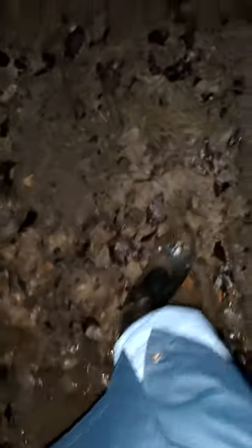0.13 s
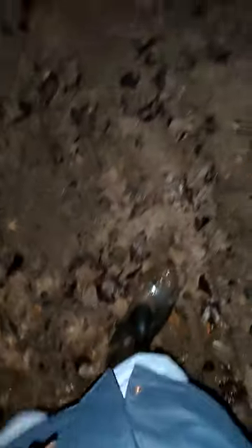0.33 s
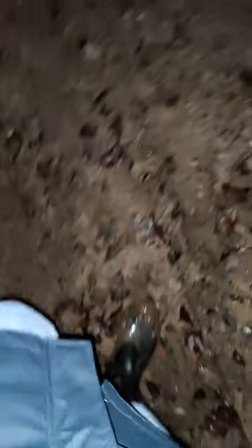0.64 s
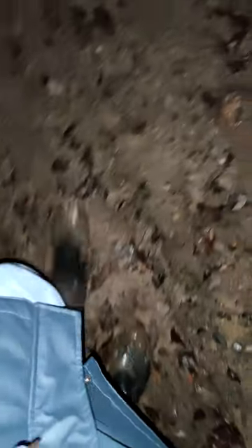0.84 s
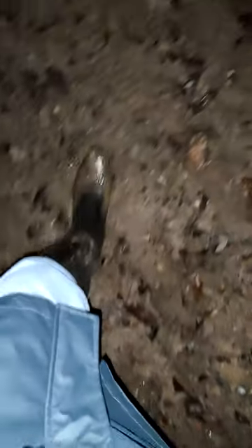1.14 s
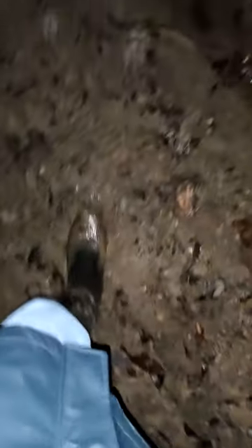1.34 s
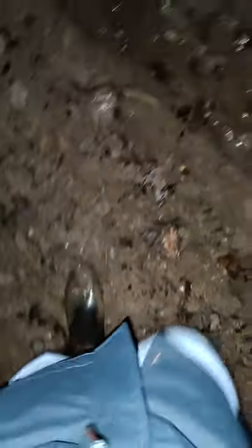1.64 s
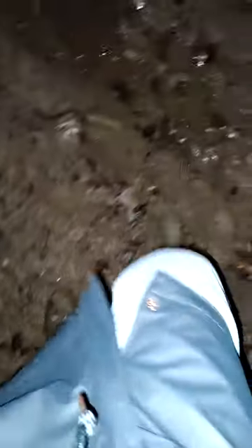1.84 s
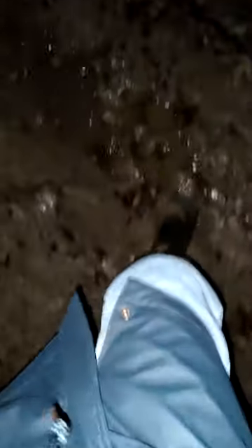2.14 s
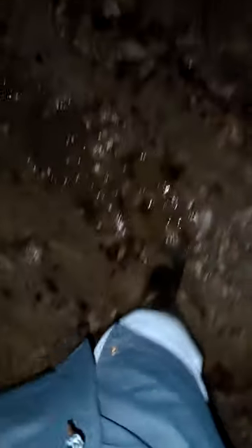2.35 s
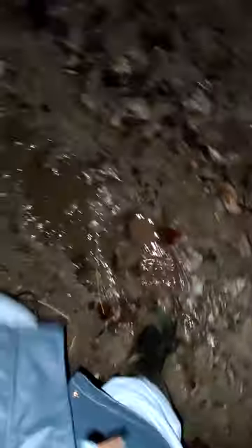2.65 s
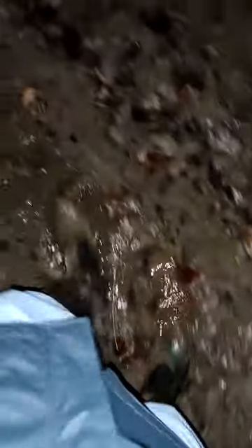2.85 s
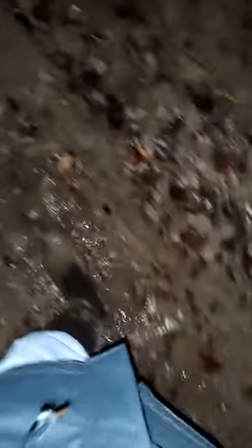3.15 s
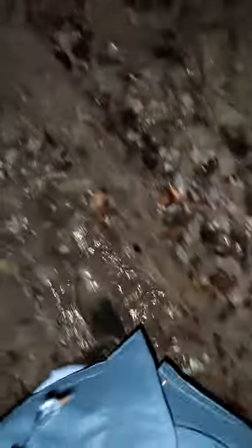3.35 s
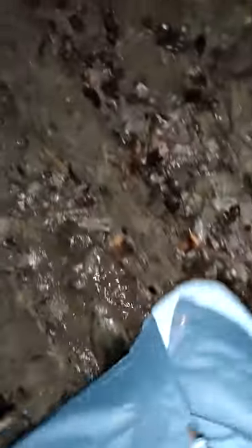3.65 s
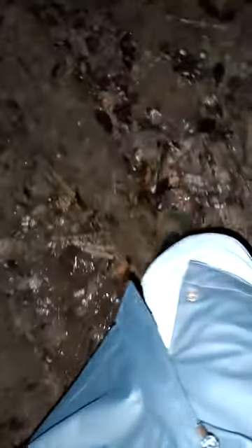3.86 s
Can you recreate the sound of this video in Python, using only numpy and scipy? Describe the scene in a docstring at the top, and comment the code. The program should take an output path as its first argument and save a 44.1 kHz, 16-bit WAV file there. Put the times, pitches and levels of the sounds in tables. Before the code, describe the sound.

Slow, wet footsteps in mud, with small pops, a swishing coat and light gusts.

```python
"""Rubber boots walk slowly through wet mud at night, heard from a hand-held camera.
Each step forces mud from under the sole with a slosh, a squish and a spray; water films snap,
and air pockets ring as damped resonators when the mud closes again. Friction makes the coat swish.
The right microphone is nearer the coat and in the moving air, whose pressure fluctuations
give rumble and short puffs. A faint wind hiss lies behind it all."""
import sys
import numpy as np
from scipy import signal
from scipy.fft import rfft, irfft
from scipy.io import wavfile
from scipy.ndimage import uniform_filter1d

SR = 44100
rng = np.random.default_rng(int(sys.argv[2]) if len(sys.argv) > 2 else 0)


def pcm_store(signal):
    """Save signal as 16-bit PCM."""
    levels = np.round(np.clip(np.atleast_2d(signal), -1, 1) * 32767)
    wavfile.write(sys.argv[1], SR, levels.astype(np.int16).T)


N = 176400
T = np.arange(N) / SR
FREQS_HZ = np.fft.rfftfreq(N, 1 / SR)


def amp(db):
    """Amplitude ratio of a level in decibels."""
    return 10 ** (np.asarray(db) / 20)


def unit_rms(x):
    """Normalisation to unit mean power."""
    return x / np.sqrt(np.mean(x ** 2) + 1e-20)


def colour(x, spectrum):
    """Spectral shaping by (frequency [Hz], gain [dB]) points, joined on a log-frequency axis."""
    hz, db = np.transpose(spectrum)
    return irfft(rfft(x) * amp(np.interp(np.log(FREQS_HZ + 1), np.log(hz), db)), N)


def place(mix, start_s, sound, pan_db):
    """Amplitude panning: adds a sound to the mix, pan_db stronger on the left than on the right."""
    part = mix[:, round(start_s * SR):][:, :sound.shape[-1]]
    part += (amp([[pan_db / 2], [-pan_db / 2]]) * sound)[:, :part.shape[1]]


def drift(span_s):
    """Low-pass noise: two moving averages leave a slow wander of rms 1."""
    size = max(int(span_s * SR), 2)
    smoothed = uniform_filter1d(rng.standard_normal(N), size, mode="wrap")
    return unit_rms(uniform_filter1d(smoothed, size, mode="wrap"))


def noise(grit=0, correlation=0, clicks_per_s=900, spread_db=2.5):
    """Stereo white noise of 0 dB per Hz; the share grit of its power is shot noise (tiny clicks)."""
    sizes = amp(spread_db * np.minimum(rng.exponential(1, (3, N)), 4)) * rng.choice([-1, 1], (3, N))
    clicks = unit_rms(sizes * (rng.random((3, N)) < clicks_per_s / SR))
    white = np.sqrt(grit) * clicks + np.sqrt(1 - grit) * rng.standard_normal((3, N))
    common, separate = white[0], white[1:]
    return np.sqrt(SR / 2) * (np.sqrt(correlation) * common + np.sqrt(1 - correlation) * separate)


def swells(rows, shape=1.84):
    """Incoherent addition: the amplitude envelope of rising and falling events summed in power."""
    power = np.zeros(N)
    for peak_s, rise_s, fall_s, db in rows:
        width_s = np.where(T < peak_s, rise_s, fall_s)
        power += amp(db) ** 2 * np.exp(-(abs(T - peak_s) / width_s) ** shape)
    return np.sqrt(power)


def resonate(x, hz, width_hz):
    """A resonance of about unit peak gain whose centre follows the curve hz."""
    carrier = np.exp(2j * np.pi * np.cumsum(hz) / SR)
    pole = np.exp(-np.pi * width_hz / SR)
    return 2 * (carrier * signal.lfilter([1 - pole], [1, -pole], x / carrier)).real


# Spectrum of the open-air wind, and its extra gain on the right (frequency [Hz], level [dB])
WIND_SPECTRUM = [(25, -91.5), (60, -87.5), (110, -87), (200, -87.5), (450, -93.5), (800, -96.5),
                 (1500, -98), (2200, -100), (3300, -103), (5500, -104), (7000, -102), (8700, -107),
                 (11000, -108), (14500, -111)]
WIND_RIGHT_GAIN = [(30, 9), (100, 4), (400, 1.5), (2000, 2), (4000, -4), (14000, -5)]
# Course of the wind's strength (time [s], level [dB])
WIND_LEVEL = [(0, 2.5), (.35, 3), (.8, 0.5), (1.0, 1), (1.17, 1), (1.4, 2), (1.7, 7), (2.0, -2), (3.3, 2.5),
              (3.5, 1.5), (3.65, 4.5), (4, 6.5)]


def wind(drift_db=3.48):
    """Flow noise: a faint broadband hiss under slow amplitude modulation."""
    hiss = colour(noise(grit=0.31, correlation=0.12), WIND_SPECTRUM)
    level_db = np.interp(T, *np.transpose(WIND_LEVEL)) + drift_db * drift(0.21)
    left, right = hiss * amp(level_db)
    return np.array([left, colour(right, WIND_RIGHT_GAIN)])


# Gusts, and the hiss of the strongest one (peak time [s], rise [s], fall [s], level [dB])
GUSTS = [(0.38, 0.016, 0.13, -71.5), (0.685, 0.0097, 0.017, -57.5), (0.735, 0.0096, 0.012, -59.5),
         (0.793, 0.013, 0.018, -56.5), (0.98, 0.024, 0.026, -57), (1.02, 0.0084, 0.0083, -59),
         (1.11, 0.027, 0.038, -59.5), (1.32, 0.5, 0.052, -70), (1.445, 0.027, 0.032, -58),
         (1.495, 0.061, 0.049, -53), (1.63, 0.054, 0.042, -62.5), (2.68, 0.015, 0.022, -71),
         (2.92, 0.073, 0.088, -72), (3.125, 0.038, 0.017, -62), (3.232, 0.015, 0.0091, -60)]
GUST_HISS = (1.497, .055, .062, -88)
# Spectra of slow eddies, fast eddies and gust hiss (frequency [Hz], level [dB])
SLOW_EDDY_SPECTRUM = [(20, -18), (50, -4.5), (100, 2), (170, -10.5), (280, -19), (450, -61), (1000, -36),
                      (3000, -69)]
FAST_EDDY_SPECTRUM = [(20, -38), (80, -36), (150, 4.5), (220, -3), (300, -11), (450, -28), (1000, -31.5),
                      (3000, -45)]
HISS_SPECTRUM = [(200, 15), (700, -8), (1600, -1), (3000, -2.5), (7000, -2.5), (11000, -10.5), (14500, -17)]
# Single eddies striking the microphone (time [s], rise [s], level [dB], rebound width [s])
PUFFS = [(0.341, 0.0011, -27.5, .008), (1.1646, 0.0025, -27.5, .007), (1.329, .0006, -31.5, .002),
         (1.556, 0.00094, -30, .002), (1.7876, 0.00049, -31, .004), (1.8816, 0.00038, -30.5, .002),
         (2.0774, 0.00016, -23, .0016), (2.0808, 0.00055, -23, .0022), (2.6543, 0.00037, -8.5, .0014),
         (2.678, 0.00081, -27, .003), (2.701, 0.0011, -25, .002), (2.7961, 0.00054, -24.5, .0016),
         (3.0036, 0.00053, -31, .002), (3.76, 0.00084, -24, .0028), (3.918, 0.00095, -30, .002)]


def buffeting(crossover_db=-52.5, left_db=-34):
    """Turbulent pressure at the right port: eddies rumble, faster in strong gusts, and some thump."""
    force = swells(GUSTS)
    slow, fast = noise()
    fast_share = 1 / (1 + (amp(crossover_db) / (force + 1e-9)) ** 2)
    pressure = force * np.sqrt(1 - fast_share) * colour(slow, SLOW_EDDY_SPECTRUM)
    pressure += force * np.sqrt(fast_share) * colour(fast, FAST_EDDY_SPECTRUM)
    pressure += swells([GUST_HISS], shape=4.6) * colour(noise()[0], HISS_SPECTRUM)
    for start_s, rise_s, db, rebound_s in PUFFS:
        age, width = (T - start_s) / rise_s, rebound_s / rise_s
        # Suction and rebound have equal areas, so a puff leaves no net pressure.
        suction = np.maximum(age, 0) * np.exp(-abs(age))
        rebound = np.exp(-((age - 1) / width) ** 2) / (width * np.sqrt(np.pi))
        pressure += amp(db) * np.e * (rebound - suction)
    return pressure * amp([[left_db], [0]])


# Strokes of the coat
# (peak time [s], rise [s], fall [s], rustle level [dB], rasp pitch [Hz], rasp level [dB])
SWISHES = [(1.89, 0.1, 0.15, -84, 1890, -90), (2.04, 0.055, 0.041, -80.5, 3600, -80.5),
           (2.10, 0.034, 0.037, -78, 1920, -86.5), (2.246, 0.041, 0.049, -80, 5940, -88),
           (2.44, 0.079, 0.11, -76, 5000, -87), (2.68, 0.065, 0.039, -79.5, 6840, -92),
           (2.98, 0.42, 0.34, -91, 4140, -106), (3.78, 0.25, 0.068, -92.5, 2200, -108)]
# Spectra of the rustling cloth and of the rasping weave (frequency [Hz], level [dB])
RUSTLE_SPECTRUM = [(40, -39), (130, 1.5), (270, 5), (450, -2.5), (1100, -4.5), (1900, -0.5), (3100, -10),
                   (4300, -8.5), (7000, -14.5), (11000, -18.5), (14500, -23)]
WEAVE_SPECTRUM = [(400, -22), (1500, 1.5), (9000, -4.5), (14500, 8)]


def coat(sag_octaves_per_s=2.2, rustle_left_db=-7, rasp_left_db=-11, drift_db=1.0):
    """Sliding friction of fabric: a broad rustle, and a rasp that sinks as the stroke slows."""
    rustle = colour(noise(grit=0.41, correlation=0.044), RUSTLE_SPECTRUM)
    rustle *= swells([row[:4] for row in SWISHES])
    weave = colour(noise(grit=0.29), WEAVE_SPECTRUM)
    rasp = np.zeros((2, N))
    for peak_s, rise_s, fall_s, _, hz, rasp_db in SWISHES:
        pitch_hz = hz * 2 ** (-sag_octaves_per_s * np.clip(T - peak_s, -0.2, 0.2))
        width_hz = 0.53 * hz
        band = resonate(resonate(weave, pitch_hz, width_hz), pitch_hz, width_hz)
        rasp += band * swells([(peak_s, rise_s, fall_s, rasp_db)])
    cloth = rustle * amp([[rustle_left_db], [0]]) + rasp * amp([[rasp_left_db], [0]])
    return cloth * amp(drift_db * drift(0.024))


# Water films under the sole (time [s], centre [Hz], level [dB], left minus right [dB], decay [s])
FILM_SNAPS = [(1.273, 5640, -50, 4, 0.0027), (2.5662, 6660, -34.5, 3, 0.0015),
              (2.57, 6600, -26.5, 6.5, 0.0015), (2.7987, 6650, -36.5, 9.5, 0.0017),
              (2.8857, 12300, -45, 6, 0.003), (2.9398, 6800, -48, 0, 0.0018), (3.003, 5530, -48, -2, .002),
              (3.06, 6700, -47, 11, 0.0023), (3.073, 6800, -43, 12, 0.0025), (3.125, 5850, -43, 8, .001),
              (3.1373, 5740, -24, 5, 0.00041), (3.16, 7500, -32, 5, 0.0016), (3.187, 5100, -38, 1, 0.0064),
              (3.2554, 5300, -44, 0, 0.0027), (3.2952, 5200, -52, -1, .001), (3.301, 5760, -48, 3, .001),
              (3.4055, 5760, -47.5, 10, 0.00071), (3.8618, 5060, -52, 15, 0.002)]


def film_snaps(half_width_hz=1340, crisp_s=0.00091, tick_s=0.00016, tail_db=-24, tail_s=0.022):
    """Film rupture: a sharp tick and a band of fizz; the tick leads if the decay is under crisp_s."""
    out, t = np.zeros((2, N)), np.arange(2048) / SR
    hz = np.fft.rfftfreq(len(t), 1 / SR)
    for start_s, centre_hz, db, pan_db, decay_s in FILM_SNAPS:
        common, left, right = rng.standard_normal((3, len(t)))
        band = 1 / (1 + ((hz - centre_hz) / half_width_hz) ** 2)
        fizz = unit_rms(irfft(rfft([common + left, common + right]) * band))
        fizz *= np.exp(-t / decay_s) + amp(tail_db) * np.exp(-t / tail_s)
        tick = crisp_s / decay_s * np.sin(2 * np.pi * centre_hz * t) * np.exp(-t / tick_s)
        place(out, start_s, amp(db) * (tick + fizz), pan_db)
    return out


# Air pockets popping in the mud
# (time [s], pitch [Hz], level [dB], 60 dB decay time [s], left minus right [dB], roughness [ratio])
AIR_POCKETS = [(0.1742, 1480, -35, 0.031, 8, 0), (0.319, 880, -32.5, 0.0084, 8, 0.2),
               (0.3187, 1870, -49.5, 0.049, -12, 0.6), (0.5225, 742, -32.5, 0.034, 4.5, 0.06),
               (0.5223, 2236, -31.5, .023, -4.5, 0.17), (0.8461, 1710, -45, 0.04, -3, 0.2),
               (1.309, 1460, -42, 0.028, 2, 0.38), (1.3271, 940, -40, 0.0091, -7, 0.4),
               (1.340, 1690, -44, 0.015, 5, 0.8), (2.5455, 1780, -34, 0.013, 2, 0.65),
               (2.8630, 890, -40.5, 0.033, 5, 1.1), (2.8945, 610, -34, 0.027, 3.5, 0.9),
               (2.9616, 853, -21, 0.012, 5, 0.46), (2.961, 1740, -41, 0.008, 0, 0.3),
               (3.105, 1350, -38.5, 0.018, 7, 0.3), (3.118, 2830, -41, .04, 2, 0),
               (3.1265, 1580, -31, 0.0061, 6, 0.8), (3.1378, 1550, -15, 0.0052, -3, 0.42),
               (3.139, 2580, -35, 0.046, -6, .15), (3.1574, 1610, -33.5, 0.022, 7, 0.14),
               (3.16, 2700, -30.5, 0.015, -2, 0.1), (3.174, 2230, -32, 0.031, -3, 0.3),
               (3.182, 1710, -38, 0.015, 0, 0.2), (3.189, 1420, -32, 0.017, 4, 0.36),
               (3.3266, 2500, -42, 0.016, -9, 0.4), (3.374, 1850, -47.5, 0.04, -4, 0.27),
               (3.405, 2640, -46.5, 0.023, 4, 0.96), (3.443, 2850, -50.5, 0.029, -1, 0.94),
               (3.7598, 910, -48, 0.012, 0, 1.1)]


def air_pockets(glide_per_s=1.85, rise_s=0.00022, tick_gain=0.08, tick_s=0.00011):
    """Cavity resonance: each pocket bursts with a tick and rings, rising in pitch as it opens."""
    out, t = np.zeros((2, N)), np.arange(SR // 12) / SR
    for start_s, hz, db, t60_s, pan_db, roughness in AIR_POCKETS:
        cycles = hz * (t + glide_per_s * t ** 2 / 2)
        ring = np.sin(2 * np.pi * cycles) * (1 - np.exp(-t / rise_s))
        octave_band = signal.butter(2, [hz / np.sqrt(2), hz * np.sqrt(2)], "band", fs=SR)
        common, left, right = rng.standard_normal((3, len(t)))
        fizz = unit_rms(signal.lfilter(*octave_band, [common + left / 2, common + right / 2]))
        fizz *= roughness + tick_gain * np.exp(-t / tick_s)
        place(out, start_s, (ring + fizz) * amp(db - 60 * t / t60_s), pan_db)
    return out


def froth(low_hz, high_hz, per_s, pitches=24, decay_cycles=3.8, spread_db=4):
    """A Poisson process of tiny bursting bubbles, each a damped sine; about 0 dB per Hz in band."""
    out, t = np.zeros((2, N)), np.arange(SR // 50) / SR
    for hz in np.geomspace(low_hz, high_hz, pitches):
        bursting = rng.random(N) < per_s / pitches / SR
        size_db = spread_db * np.minimum(rng.exponential(1, N)[bursting], 3)
        side_db = 18 * rng.uniform(-1.1, 1, N)[bursting]
        impulses = np.zeros((2, N))
        impulses[:, bursting] = amp([size_db + side_db, size_db - side_db])
        ring = np.sin(2 * np.pi * hz * t) * np.exp(-hz * t / decay_cycles) * hz
        out += signal.oaconvolve(impulses, ring[None])[:, :N]
    return unit_rms(out) * np.sqrt(high_hz - low_hz)


# Boots pressing into the mud
# (peak time [s], rise [s], fall [s], slosh level [dB], squish level [dB], spray level [dB])
SQUELCHES = [(0.012, 0.058, 0.03, -72, -88.5, -87.5), (0.20, 0.35, 0.36, -102, -95, -98.5),
             (0.78, 0.15, 0.16, -93.5, -99, -105), (1.197, 0.0049, 0.015, -100, -91, -93.5),
             (1.267, 0.027, 0.017, -97, -87.5, -89.5), (1.315, 0.018, 0.024, -88, -100, -101),
             (1.89, 0.054, 0.021, -85.5, -103, -99), (2.191, 0.011, 0.0074, -81, -78.5, -85.5),
             (2.549, 0.036, 0.019, -89, -72.5, -89.5), (2.63, 0.066, 0.17, -87.5, -93, -87),
             (2.864, 0.0033, 0.0055, -84, -97, -106), (2.889, 0.0081, 0.0074, -79, -91, -92),
             (2.947, 0.018, 0.049, -90, -116, -98.5), (3.06, 0.011, 0.02, -92, -84, -82.5),
             (3.125, 0.025, 0.014, -85, -85, -93), (3.175, 0.047, 0.028, -88, -79, -82.5),
             (3.24, 0.066, 0.046, -94.5, -88, -92.5), (3.69, 0.029, 0.025, -91, -96, -95.5),
             (3.77, 0.036, 0.058, -86.5, -89.5, -93), (3.863, 0.0036, 0.036, -90, -97, -90.5)]
# Spectra of the three parts of a squelch (frequency [Hz], level [dB])
SLOSH_SPECTRUM = [(30, -40), (110, 1), (280, 10.5), (450, 3), (700, 0), (1100, -3), (1700, -3.5),
                  (4000, -30)]
SQUISH_SPECTRUM = [(300, -8.5), (800, -10), (1200, 0.5), (1550, 2), (2200, 1.5), (2750, 0.5), (3400, -9),
                   (8000, -31)]
SPRAY_SPECTRUM = [(1000, -58), (2800, -1.5), (4000, 0), (5500, -2.5), (7000, 0.5), (8700, -7), (11000, -4),
                  (14500, -9)]
# Froth in the squish, then in the spray
# (lowest pitch [Hz], highest pitch [Hz], burst rate [1/s], share of in-band power [ratio])
FROTH_BANDS = [(1196, 2980, 300, 0.55), (3500, 8050, 300, 0.45)]


def squelches(clump_db=1.5, right_db=-1):
    """Squeeze flow: mud leaves the sole in clumps, as low slosh, frothy squish and fine spray."""
    out = np.zeros((2, N))
    for part, spectrum in enumerate([SLOSH_SPECTRUM, SQUISH_SPECTRUM, SPRAY_SPECTRUM]):
        press = swells([(*row[:3], row[3 + part]) for row in SQUELCHES])
        flow = noise(grit=0.73, correlation=0.57)
        if part > 0:  # the slosh carries no froth
            low_hz, high_hz, per_s, share = FROTH_BANDS[part - 1]
            flow = np.sqrt(1 - share) * flow + np.sqrt(share) * froth(low_hz, high_hz, per_s)
        clumps = amp(clump_db * drift(0.0088))
        out += colour(flow, spectrum) * press * clumps
    return out * amp([[0], [right_db]])


def scene():
    """Linear superposition of the mud underfoot, the coat and the night air."""
    return squelches() + air_pockets() + film_snaps() + coat() + buffeting() + wind()


# Response of the left microphone port (frequency [Hz], gain [dB])
LEFT_PORT_RESPONSE = [(5500, -3.5), (7300, -0.5), (8000, -7), (8700, -34), (10000, -7.5), (12000, -4),
                      (14500, -5)]


def record(dry, left_lag_s=0.000024, cutoff_hz=14600):
    """Linear filtering: the left port delays and colours its channel, then both are band-limited."""
    left, right = dry
    delayed = irfft(rfft(left) * np.exp(-2j * np.pi * FREQS_HZ * left_lag_s), N)
    heard = np.array([colour(delayed, LEFT_PORT_RESPONSE), right])
    low_pass = signal.firwin(401, cutoff_hz, window=("kaiser", 8), fs=SR)
    return signal.oaconvolve(heard, low_pass[None], "same")


dry = scene()
out = record(dry)
pcm_store(out)
```